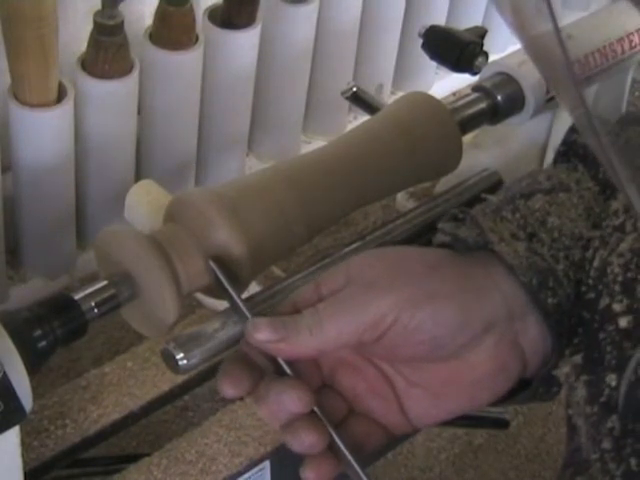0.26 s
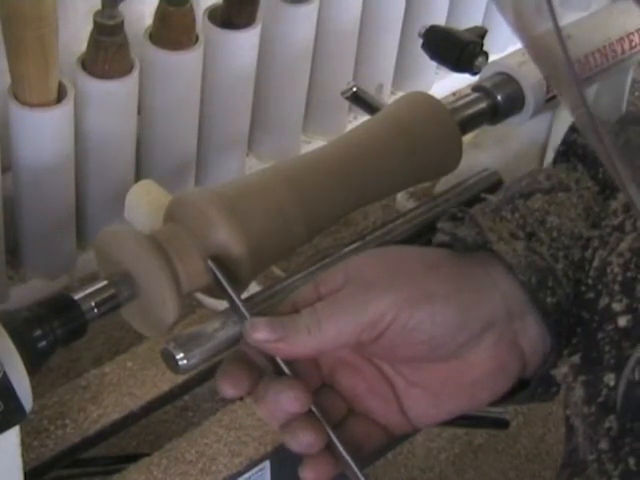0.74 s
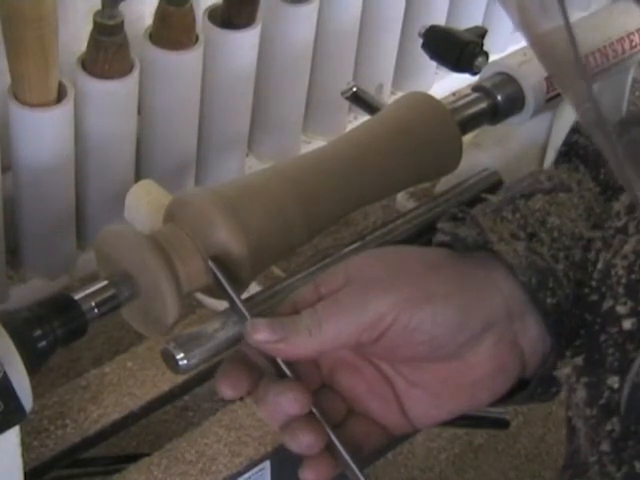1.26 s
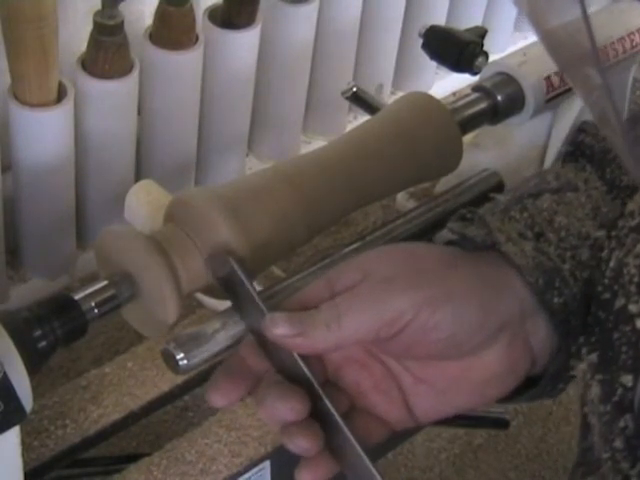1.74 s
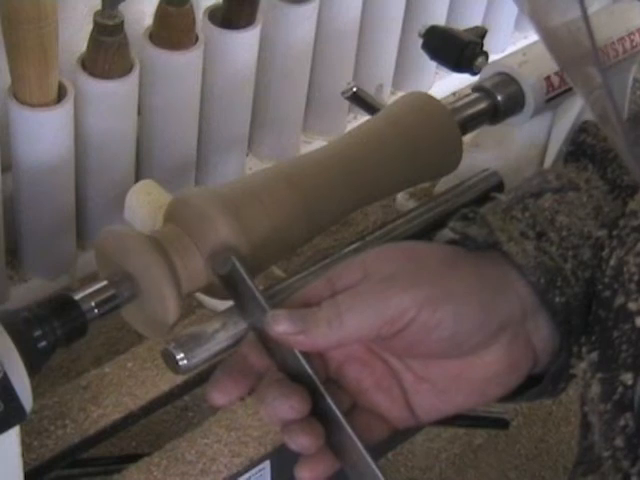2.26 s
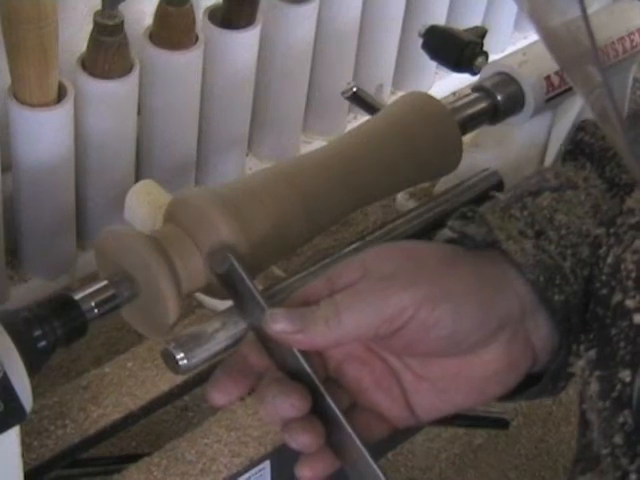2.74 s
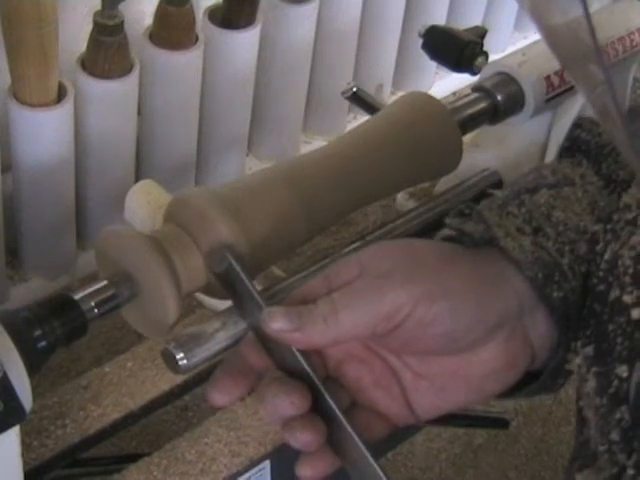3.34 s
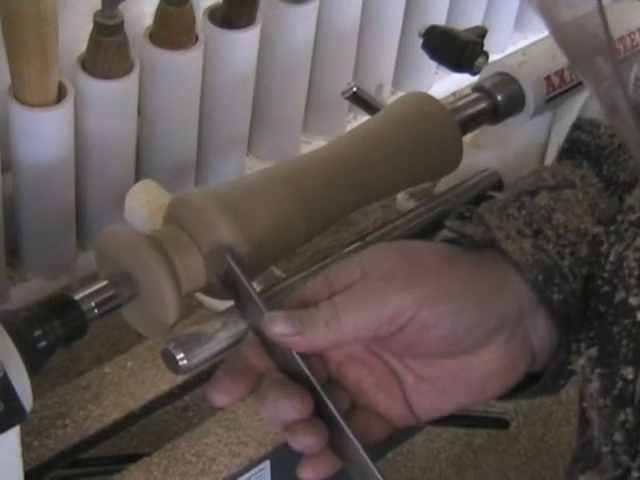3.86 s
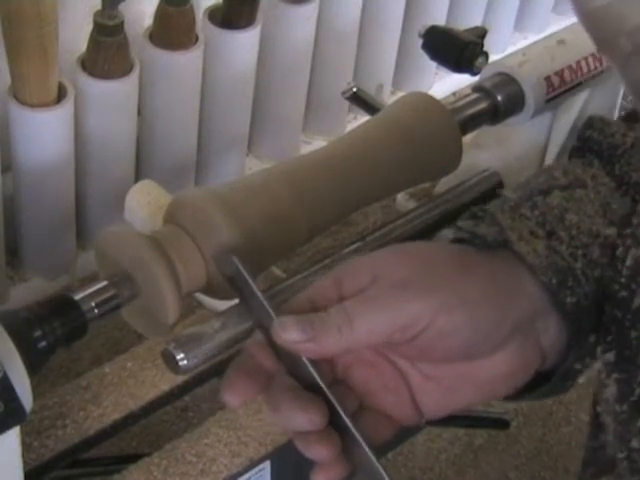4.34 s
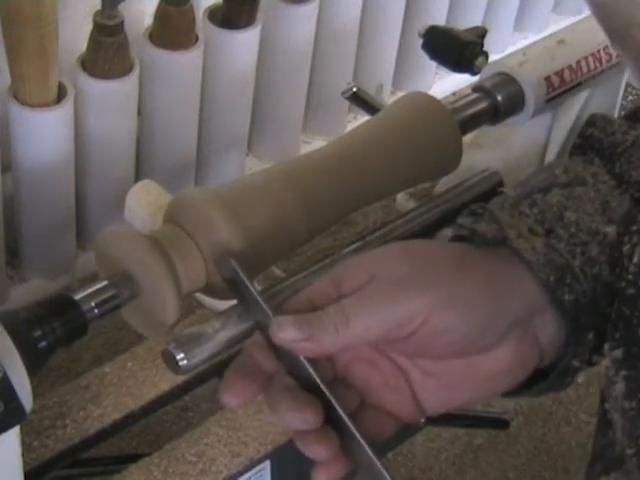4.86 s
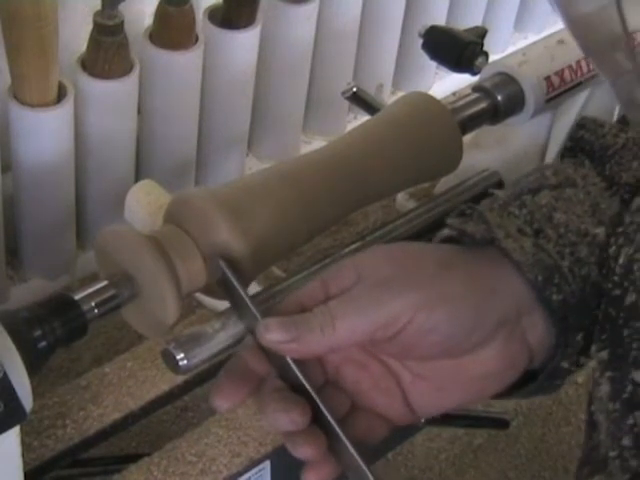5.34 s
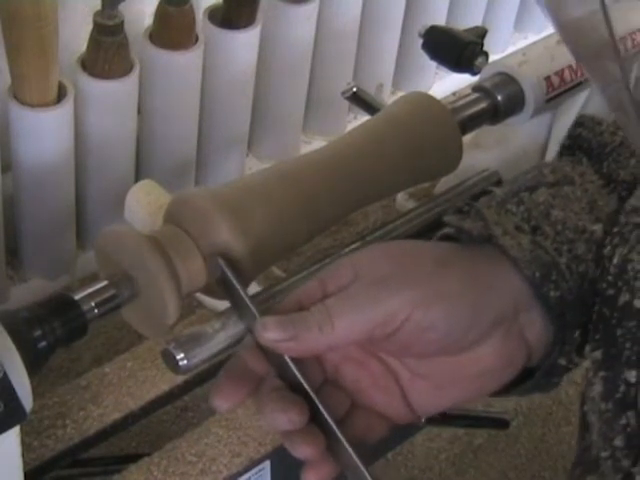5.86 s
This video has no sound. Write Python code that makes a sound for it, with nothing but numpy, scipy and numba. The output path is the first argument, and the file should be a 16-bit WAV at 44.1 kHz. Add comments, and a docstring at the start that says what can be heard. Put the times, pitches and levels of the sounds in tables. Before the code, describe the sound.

A spinning lathe drones and rattles near the microphone, in stereo with short room reflections. A blade rasps and squeals on wood for about a second, lifts, then snags in a rapid triple clack. Another rising, airy cut with singing tones follows, then plain machine whir and a tiny final scrape.

```python
"""A small workshop: a wood lathe spins a spindle, heard up close through two microphone ports.
The belt rumbles, the ball bearings buzz and the motor hums, with mains hum and a thin electronic whine.
A hand tool takes two cuts, blade upright and then laid over, each followed later by a brief touch.
The edge meets nearly the same surface on every turn, fibres tear off it and the blade squeals.
The load of the cuts slows the spindle a little; in the first touch the tool catches, knocks and cracks."""
import sys
import numpy as np
from scipy import signal
from scipy.fft import rfft, irfft
from scipy.io import wavfile
from scipy.ndimage import uniform_filter1d, map_coordinates
from numba import njit

SR = 44100
rng = np.random.default_rng(int(sys.argv[2]) if len(sys.argv) > 2 else 0)


def waveform_to_disk(signal):
    """Save audio, clipped to [-1, 1], as 16-bit WAV at the path in sys.argv[1]."""
    frames = np.transpose(np.atleast_2d(signal))
    scaled = np.clip(frames, -1, 1) * 32767
    samples = np.round(scaled).astype(np.int16)
    wavfile.write(sys.argv[1], SR, samples)


N = 268569
T = np.arange(N) / SR
HZ = np.maximum(np.arange(N // 2 + 1) * SR / N, 1)  # the floor of 1 Hz allows a logarithm

IDLE_TURNS_PER_S = 46.54
RELEASE_S = 0.0607  # time to lift the tool off
JUDDER_POWER = 0.62  # tearing grows in step with the pressure, judder by this power of it

# the cuts, first with the blade upright, then laid over: start_s, attack_s, end_s, slowing_turns_per_s
CUTS = [(-.1, .1, 1.215, .87), (2.215, 0.474, 3.72, .39)]
# judder spectrum with the blade upright: pitch_hz, level_db (relative)
PLUNGE_COLOUR = [(120, -34), (180, -19), (250, -14), (320, 0.5), (410, -3), (560, -5.5), (820, 2.5),
                 (1200, -4), (1480, 0), (2000, -9), (3000, -18), (4500, -20), (9000, -54)]
# spectra of tearing fibres, blade upright and laid over: pitch_hz, level_db (relative)
PLUNGE_HISS = [(500, -22), (1500, -1.5), (2000, -2), (2600, 1), (3400, -1), (4400, -6.5), (5600, -2.5),
               (6800, -6), (7400, -8), (8600, -7.5), (9300, -12), (11300, -11.5), (14000, -93)]
SHEAR_HISS = [(500, -24), (1500, -17), (2600, -3.5), (3400, -3.5), (4600, -10), (5500, -0.5), (6200, -7),
              (6900, -0.5), (7450, -7), (8600, -4.5), (9400, -15), (11300, -10), (14000, -100)]
# resonances of blade, rest and workpiece: centre_hz, width_hz, lift_db
RINGS = [(1740, 58, 3.5), (2390, 56, -8), (2860, 250, 6.5), (3830, 190, 4), (4670, 91, 5.5), (5380, 160, 5),
         (5810, 50, 9.5), (6575, 200, 9.5), (6960, 150, 5.5), (7970, 420, 7.5), (8660, 150, 0),
         (9720, 580, 3.5)]


def undb(db):
    """Decibels to gain."""
    return np.exp(np.asarray(db) * (np.log(10) / 20))


def colour(x, points, rings=()):
    """Give x a smooth spectrum with resonances on top, at rms 1."""
    hz, db = np.transpose(points)
    db = np.interp(np.log(HZ), np.log(hz), db)
    for centre, width, lift in rings:
        db = db + lift / (1 + (2 * (HZ - centre) / width) ** 2)
    y = irfft(rfft(x) * undb(db), N)
    return y / y.std()


def walk(rate):
    """Slow chance: smoothed random levels, `rate` new ones per second, spread 1."""
    hold = max(int(SR / rate), 1)
    steps = np.repeat(rng.standard_normal(N // hold + 1), hold)
    y = uniform_filter1d(steps, hold)[:N]
    return y / y.std()


def surface(turns, memory, size):
    """Roughness read round a loop of `size` spots; each lap keeps a share of the lap before."""
    memory = np.clip(memory, 0, .995)
    laps = rng.standard_normal((int(turns[-1]) + 2, size))
    for k in range(1, len(laps)):
        laps[k] = memory * laps[k - 1] + np.sqrt(1 - memory ** 2) * laps[k]
    return map_coordinates(laps.ravel(), [turns * size], order=3, mode="nearest")


def tone(cycles, db):
    """A sine of given rms level that starts anywhere in its cycle."""
    return np.sqrt(2) * undb(db) * np.sin(2 * np.pi * (cycles + rng.random()))


def swell(start, attack, end, release):
    """Attack, hold and release, between 0 and 1; an end before full attack caps the peak."""
    return np.clip((T - start) / attack, 0, 1) * np.clip((end - T) / release, 0, 1)


def strike(start, modes, level_db):
    """Modes that ring out from one blow, each falling 60 dB in its t60."""
    age = np.maximum(T - start, 0)
    return sum(undb(level_db + db - 60 * age / t60) * np.sin(2 * np.pi * hz * age)
               for hz, db, t60 in modes)


@njit
def resonate(x, hz, width):
    """Band-pass with a moving centre, gain 1 at the centre."""
    y, band, low = np.empty(len(x)), 0., 0.
    for i in range(len(x)):
        g, damping = np.tan(np.pi * hz[i] / SR), width / hz[i]
        v = (band + g * (x[i] - low)) / (1 + g * (g + damping))
        band = 2 * v - band
        low = low + 2 * g * v
        y[i] = damping * v
    return y


def port_rumble():
    """Faint low noise, unrelated at the two ports."""
    shape = [(30, -34), (50, -4), (75, 10), (115, 11), (250, -23), (1000, -26), (4000, -36), (12000, -40)]
    return undb(-51) * np.array([colour(rng.standard_normal(N), shape) for _ in range(2)])


def workshop(x, t60, wet_db):
    """Short, dense reflections from bench and walls, different at each port."""
    t = T[:SR // 2]
    tails = rng.standard_normal((2, len(t))) * undb(-60 * t / t60) * (t > .003)
    tails /= np.sqrt(np.sum(tails ** 2, axis=1, keepdims=True))
    return x + undb(wet_db) * signal.fftconvolve(x[None], tails, axes=1)[:, :N]


def spindle():
    """Turns made so far and the load (0-1): pressure on the tool slows the spindle, a moment late."""
    inertia_s = 0.0529
    drag = sum(slowing * swell(start, attack, end, RELEASE_S) ** 2
               for start, attack, end, slowing in CUTS)
    step = 1 / (inertia_s * SR)
    sag = drag[0] + signal.lfilter([step], [1, step - 1], drag - drag[0])
    return np.cumsum(IDLE_TURNS_PER_S - sag) / SR, sag / sag.max()


def electrics(load):
    """Mains hum at twice the mains rate, softer under load, and a thin electronic whine."""
    mains_hz, whine_hz = 50, 12221
    # level of the whine: time_s, level_db
    whine_level = [(0, -55), (3.7, -53), (4.5, -47), (5.3, -54)]
    hum = tone(2 * mains_hz * T, db=-42.5 - 5.8 * load)
    return hum + tone(whine_hz * T, np.interp(T, *np.transpose(whine_level)))


def motor(load):
    """Tones of the motor's rotation and its bearing, whose levels shift with load and waver by chance."""
    motor_hz, balls_per_turn = 48.6, 3.972
    # multiple of motor speed, multiple of its bearing's ball rate, level_db, change_at_full_load_db
    motor_tones = [(1, 0, -49.5, -3), (14, 0, -46, -16), (16, 0, -34.5, -3), (0, 1, -37, -47),
                   (0, 2, -32, -9.5), (0, 3, -43, 2), (0, 8, -37.5, -2), (32, 0, -42, -10),
                   (0, 12, -43, -22)]
    motor_turns = motor_hz * T + 0.0011 * walk(3.18)
    out = 0
    for k, balls, db, loaded_db in motor_tones:
        rate = round(k) + round(balls) * balls_per_turn
        out = out + tone(rate * motor_turns, db + loaded_db * load + 1.36 * walk(12))
    return out


def belt(turns, load):
    """The belt rumbles and throbs as its bumps return, slowly changing, on every lap."""
    laps_per_turn, throb_db = .1431, 1.2
    # rumble spectrum: pitch_hz, level_db (relative)
    belt_colour = [(30, -46), (70, -42), (115, -6), (165, -12), (200, 1.5), (240, 2.5), (300, -1), (420, 2),
                   (540, -2.5), (700, -9), (820, -8), (1000, -8.5), (1300, -13), (2500, -31)]
    laps = laps_per_turn * turns
    bumps = undb(throb_db * surface(laps, memory=0.65, size=3))
    rumble = colour(surface(laps, memory=0.6, size=4096) * bumps, belt_colour)
    return undb(-27.5 - 2.6 * load) * rumble


def bearings(turns):
    """Balls roll over flaws at both spindle ends; their rattle returns with the cage and swells once a turn."""
    balls_per_turn, cage_per_turn, tail_balls_per_turn = 5.85, .2544, 4.425
    cage_sway = .017  # ball spacings by which the balls run ahead and fall behind per cage turn
    drone_db, drone_swell_db, drone_swell_s, drone_rise_s = -40, 9, 2.85, 0.51
    # bearing tones: multiple of the ball rate, sideband in spindle turns, level_db
    bearing_tones = [(0, 2, -49.5), (0, 4, -37), (0, 5, -37.5), (0, 9, -41), (0, 10, -41), (3, 0, -45),
                     (4, 0, -42), (5, 0, -49), (6, -1, -37.5), (6, 0, -29.7), (7, -2, -49), (7, 0, -42),
                     (8, -1, -45), (8, 0, -37), (9, -1, -42), (9, 0, -36), (11, -1, -46)]
    # tones of the bearing in the tailstock: multiple of its ball rate, level_db
    tail_tones = [(1, -44.5), (2, -40.5), (3, -46.5), (7, -47)]
    # rattle spectrum: pitch_hz, level_db (relative)
    rattle_colour = [(600, -9.5), (1000, -3.5), (1300, -19), (1500, -0.5), (2000, -1), (2900, -3.5),
                     (3500, -8), (5200, -8.5), (6800, -9.5), (8200, -15), (9400, -11.5), (11000, -25.5),
                     (14000, -57)]
    # peaks of the rattle, near multiples of the ball rate: centre_hz, width_hz, lift_db
    rattle_peaks = [(1570, 180, 6), (1893, 100, 8.5), (2120, 77, 5.5), (2473, 110, 12), (2764, 99, 8.5),
                    (2931, 87, 11), (3210, 230, 9.5), (3525, 180, 8), (3820, 100, 9), (4040, 110, 8.5),
                    (4595, 125, 8.5), (4910, 38, 11), (5110, 93, 9), (5390, 78, 8), (5890, 72, 8),
                    (6400, 80, 7), (6630, 88, 3.5), (6960, 140, 3)]

    sway = cage_sway * np.sin(2 * np.pi * cage_per_turn * turns)
    balls = balls_per_turn * turns + sway + .002 * walk(20)
    buzz = sum(tone(k * balls + side * turns, db + 0.5 * walk(12)) for k, side, db in bearing_tones)

    # a low drone one turn above the ball rate swells during the second cut and stays
    risen = np.clip((T - drone_swell_s) / drone_rise_s, 0, 1)
    drone = tone(balls + turns, drone_db + drone_swell_db * risen + 1.3 * walk(17))

    knocks = undb(0.93 * np.cos(2 * np.pi * balls) + 1.36 * np.cos(2 * np.pi * turns))
    rattle = surface(cage_per_turn * turns, memory=0.81, size=3726) * knocks
    tailstock = sum(tone(round(k) * tail_balls_per_turn * turns, db + 2.0 * walk(9.1))
                    for k, db in tail_tones)
    return buzz + drone + tailstock + undb(-26.5) * colour(rattle, rattle_colour, rattle_peaks)


def shudder(turns):
    """The workpiece bends under the first cut and shudders in a low band that follows its surface."""
    # spectrum: pitch_hz, level_db (relative)
    shudder_colour = [(140, -49), (210, -6), (235, 4), (280, 3), (380, 0), (800, -50)]
    bending = colour(surface(turns, memory=0.6, size=960), shudder_colour)
    return bending * undb(-27) * swell(start=-0.15, attack=1, end=0.81, release=0.173)


def catches():
    """The tool catches: the wood cracks in a burst of noise and knocks, and the tool rest rings."""
    crack_t60_s = 0.03
    # three catches on successive turns: start_s, knock_db, crack_db, rest_ring_db
    catch_times = [(1.869, -30, -21, -23), (1.889, -29, -27, -18), (1.911, -16, -25, -25)]
    # modes of the wood: pitch_hz, level_db (relative), t60_s
    wood_modes = [(335, -7, .07), (758, -7, 0.13), (816, -2, 0.083), (915, -8, 0.15), (1020, -3, 0.082)]
    # modes of the tool rest: pitch_hz, level_db (relative), t60_s
    rest_modes = [(1630, 2, 0.051), (2870, -4, .07)]
    splinter = colour(rng.standard_normal(N), PLUNGE_HISS, RINGS)
    out = 0
    for start, knock_db, crack_db, rest_db in catch_times:
        age = np.maximum(T - start, 0)
        crack = splinter * (age > 0) * undb(crack_db - 60 * age / crack_t60_s)
        out = out + crack + strike(start, wood_modes, knock_db) + strike(start, rest_modes, rest_db)
    return out


def end_grain(turns, grain_db):
    """Hardness of the wood round one turn: uneven, and raised at the two faces of end grain."""
    return undb(grain_db * surface(turns, memory=0.86, size=14) + 0.53 * np.cos(4 * np.pi * turns))


def snags(x, turns, depth_db):
    """Hard spots each excite their own band at nearly the same place per turn: a regular flutter."""
    # centres of the excited bands: centre_hz
    band_hz = [900, 1600, 2300, 3000, 3900, 5000, 6400, 8200]
    spectrum, out = rfft(x), 0
    for share in np.eye(len(band_hz)):
        band = irfft(spectrum * np.interp(HZ, band_hz, share), N)
        spots = undb(depth_db * surface(turns, memory=0.97, size=9))
        # dividing by the running rms over about four turns keeps the level even
        out = out + band * spots / np.sqrt(uniform_filter1d(spots ** 2, size=3800))
    return out


def cut(turns, stroke, judder_colour, hiss_colour, judder_db, hiss_db, memory, grain_db,
        roughest_s=0, settle_db_per_s=0, snag_db=0):
    """The edge judders over its own earlier marks and tears fresh fibres, harder at the end grain.
    Given a settling rate, the judder builds to its roughest moment, then settles as the wood is trued."""
    slip_turns = .0025  # how far the edge slips to and fro over its marks
    pressure = swell(*stroke[:3], RELEASE_S)
    grain = end_grain(turns, grain_db)
    marks = surface(turns + slip_turns * walk(150), memory, size=960)
    judder_level = undb(judder_db - settle_db_per_s * np.abs(T - roughest_s))
    judder = colour(marks * grain, judder_colour, RINGS) * judder_level
    tearing = colour(rng.standard_normal(N) * grain, hiss_colour, RINGS) * undb(hiss_db)
    if snag_db:
        tearing = snags(tearing, turns, snag_db)
    return pressure * tearing + pressure ** JUDDER_POWER * judder


def chatter(turns, stroke, ripples):
    """Each ripple on the wood sings while it grows under the edge and is cut away again."""
    tones = 0
    for k, db, peak_s, fade in ripples:
        level_db = db - fade * np.abs(T - peak_s) + 0.25 * walk(8)
        tones = tones + tone(round(k) * turns + 0.08 * walk(8), level_db)
    return tones * swell(*stroke[:3], RELEASE_S) ** JUDDER_POWER


def blade(turns, stroke, ring, ring_db, bite_db):
    """The scrape sets the blade squealing; modes swell once a turn and shift as the contact point moves."""
    # ratio to the blade's pitch, half_width_hz, level_db, squeal_db against the mode's noise, waver_hz
    blade_modes = [(1, 111, -2.5, 4, 24.05), (1.119, 280, -2, -22, 119.3), (1.3, 250, -0.5, -15, 90)]
    times, pitch, *levels = np.transpose(ring)
    hz = np.interp(T, times, pitch)
    scrape = rng.standard_normal(N)
    out = 0
    for (ratio, width, db, squeal_db, waver_hz), level in zip(blade_modes, levels):
        mode_hz = ratio * hz
        mode = resonate(resonate(scrape, mode_hz, 2. * width), mode_hz, 2. * width)
        squeal = tone(np.cumsum(mode_hz + waver_hz * walk(170)) / SR, squeal_db)
        bite = undb(bite_db * np.cos(2 * np.pi * (turns + rng.random())))
        sound = (mode / mode.std() + squeal) * bite
        out = out + sound / sound.std() * undb(ring_db + db + np.interp(T, times, level))
    return out * swell(*stroke[:3], RELEASE_S)


def touches(turns):
    """Light touches of the edge: short, soft cuts whose marks are soon lost."""
    # start_s, attack_s, end_s, level_db (added to the levels below)
    strokes = [(1.85, 0.022, 1.96, -2), (6.05, 0.031, 6.2, -1.5)]
    return sum(undb(db) * cut(turns, stroke, PLUNGE_COLOUR, SHEAR_HISS, judder_db=-29.5, hiss_db=-28,
                              memory=0.33, grain_db=1.0)
               for *stroke, db in strokes)


def shear(turns, stroke):
    """Second cut, blade laid over: judder and tearing, ripples that sing, and the blade's squeal."""
    # judder spectrum: pitch_hz, level_db (relative)
    shear_colour = [(120, -37), (200, -8), (450, 3), (620, -3), (850, 0.5), (1050, 2), (1300, -6),
                    (1500, 9.5), (2000, -8), (3000, -14), (4500, -13), (9000, -33)]
    # ripples left by the blade: ripples per turn, peak_db, peak_s, fade_db_per_s before and after
    ripples = [(10, -32.5, 3.1, 14), (18, -32, 3.03, 37), (19, -35, 3.26, 14), (20, -34, 2.87, 30),
               (21, -38, 2.76, 15), (22, -30.5, 2.97, 17), (23, -30, 4, 7.2), (24, -39, 3.2, 5.2),
               (25, -33, 2.78, 25), (27, -34, 2.78, 44), (30, -39, 2.7, 14), (32, -34, 3.4, 6),
               (35, -23, 2.76, 20), (64.2, -39, 2.4, 9)]
    # blade ring: time_s, pitch_hz, lower_mode_db, middle_mode_db, upper_mode_db (all relative)
    ring = [(2.4, 2920, -38, -44, -35), (2.52, 2966, -28, -36, -28), (2.66, 2907, -24, -26, -28.5),
            (2.849, 2974, -26.5, -28, -26.5), (3.144, 2975, -35, -45, -33), (3.226, 2952, -27.5, -38, -32),
            (3.384, 2950, -33, -40, -31), (3.47, 3010, -36, -45, -51), (3.622, 3000, -28, -27, -39),
            (3.68, 2960, -31, -33, -31)]
    scraping = cut(turns, stroke, shear_colour, SHEAR_HISS, judder_db=-25.5, hiss_db=-20.5,
                   memory=0.69, grain_db=1.0, roughest_s=2.6, settle_db_per_s=1.0, snag_db=1.0)
    squeal = blade(turns, stroke, ring, ring_db=3.0, bite_db=2.5)
    return scraping + chatter(turns, stroke, ripples) + squeal


def plunge(turns, stroke):
    """First cut, blade upright: judder and tearing, ripples that sing, and the blade's squeal."""
    # ripples left by the blade: ripples per turn, peak_db, peak_s, fade_db_per_s before and after
    ripples = [(4, -37.5, 0.32, 10), (5, -26.5, 0.42, 25), (6, -37, 0.49, 14), (7, -38, 0.36, 13),
               (9, -28.5, 0.3, 4), (10, -37, .3, 10), (13, -28.5, 1.45, 4), (15, -37, .33, 25),
               (16, -33, 0.38, 17), (17, -31.5, .7, 7), (18, -27, 0.37, 10), (21, -29.5, 0.21, 10),
               (23, -31.5, 1.18, 17), (26, -39, .8, -2), (30, -34, .1, 6), (32, -30, 0.73, 1),
               (35, -27, .25, 6), (36, -26, 0.21, 19), (51, -31.5, 1.06, 17), (59, -28.5, 1.2, 14),
               (64.56, -33, 0.67, 2), (66.1, -33, 0.7, 4), (68.6, -29, 1.05, 14), (103, -36, 0.71, 2),
               (116.4, -36.5, .4, 8), (129.5, -33.5, 0.52, 17)]
    # blade ring: time_s, pitch_hz, lower_mode_db, middle_mode_db, upper_mode_db (all relative)
    ring = [(0.0, 2960, -37, -23, -29), (0.06, 2984, -28, -27, -30), (0.33, 2997, -27, -33, -47),
            (0.501, 2940, -33, -33, -32), (0.699, 3010, -25.5, -28, -27), (1.151, 3003, -26, -32, -33.5)]
    scraping = cut(turns, stroke, PLUNGE_COLOUR, PLUNGE_HISS, judder_db=-24, hiss_db=-20.5,
                   memory=0.84, grain_db=-0.24, roughest_s=0.12, settle_db_per_s=4.5, snag_db=2.0)
    squeal = blade(turns, stroke, ring, ring_db=1.5, bite_db=4)
    return scraping + chatter(turns, stroke, ripples) + squeal


def scene():
    """Machine and tool in the workshop; the spindle's turns pace the machine and the cuts."""
    turns, load = spindle()
    upright, laid_over = CUTS
    machine = electrics(load) + motor(load) + belt(turns, load) + bearings(turns)
    workpiece = shudder(turns) + catches()
    tool = touches(turns) + shear(turns, laid_over) + plunge(turns, upright)
    return workshop(machine + workpiece + tool, t60=0.28, wet_db=-13) + port_rumble()


def record(dry):
    """Sound reaches the right port just before the left; the top is cut."""
    top_hz = 12400
    # phase between the ports: pitch_hz, left_lead_rad
    port_phase = [(0, 0), (2150, -.12), (4000, -.65), (5400, -.9), (7400, -1.5), (9300, -1.95),
                  (10300, -2.5), (12200, -2.95), (13000, -3.1)]
    lead = np.interp(HZ, *np.transpose(port_phase))
    fade = np.minimum(np.minimum(T, T[-1] - T) / .002, 1)  # 2 ms at both ends
    ports = irfft(rfft(dry * fade) * np.exp(.5j * np.array([lead, -lead])), N)
    low_pass = signal.ellip(8, .2, 70, top_hz, fs=SR, output="sos")
    return signal.sosfilt(low_pass, ports)


dry = scene()
out = record(dry)
waveform_to_disk(out)
```